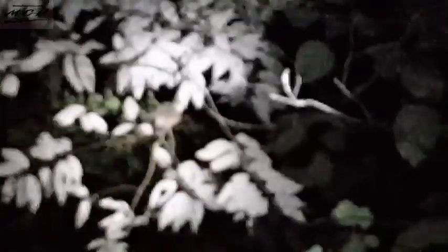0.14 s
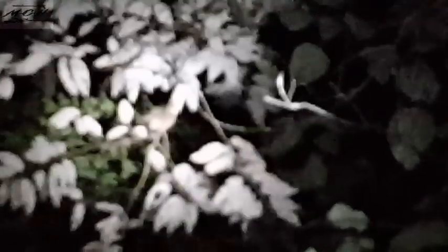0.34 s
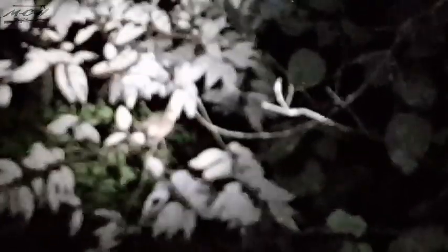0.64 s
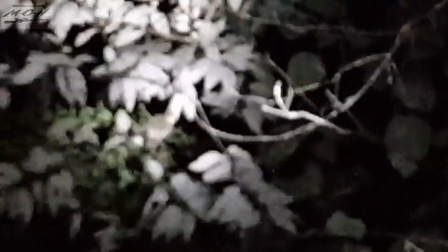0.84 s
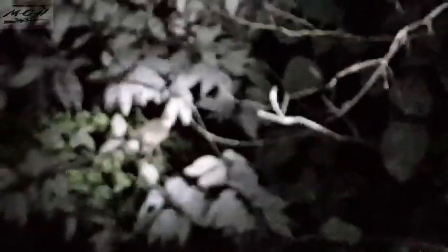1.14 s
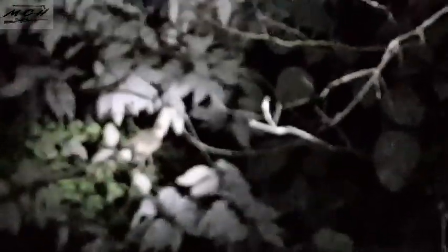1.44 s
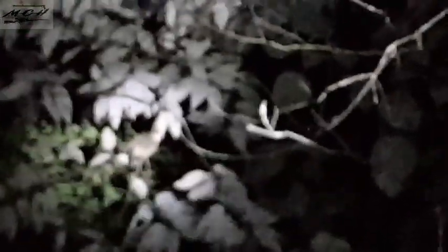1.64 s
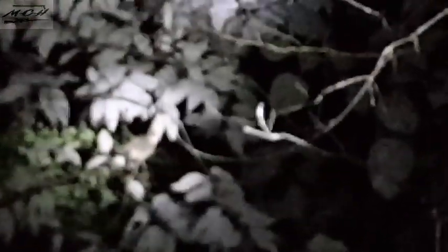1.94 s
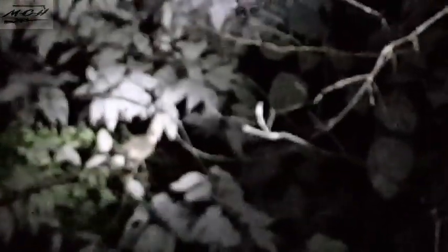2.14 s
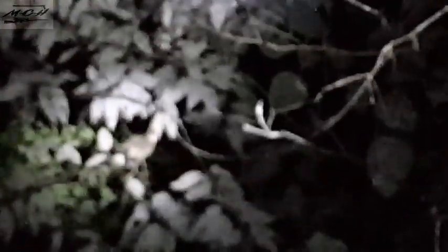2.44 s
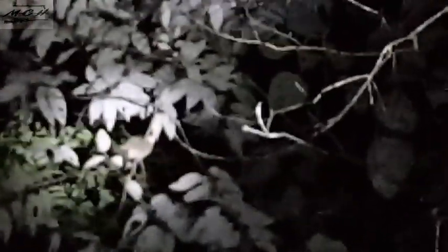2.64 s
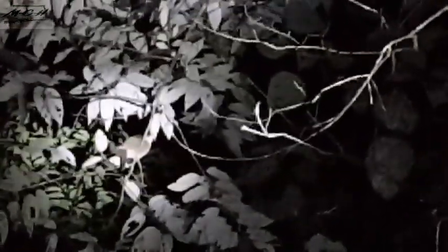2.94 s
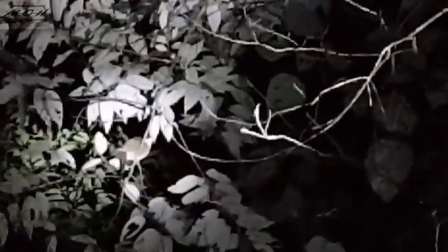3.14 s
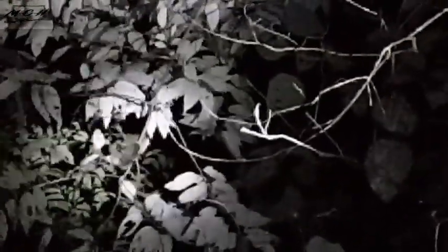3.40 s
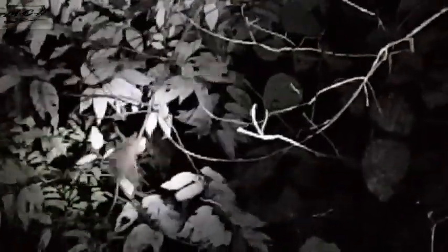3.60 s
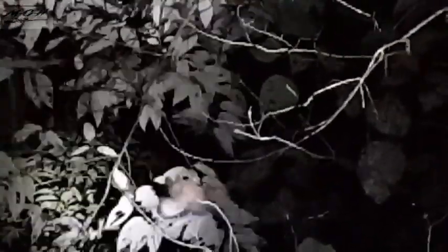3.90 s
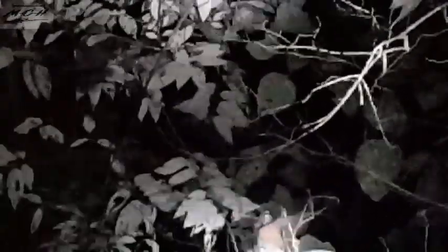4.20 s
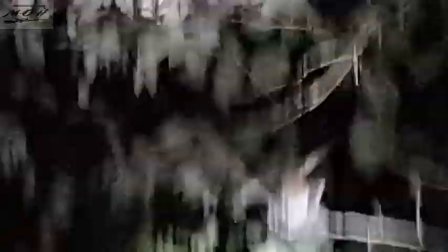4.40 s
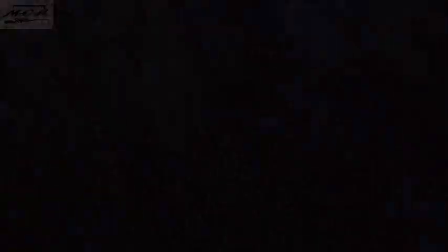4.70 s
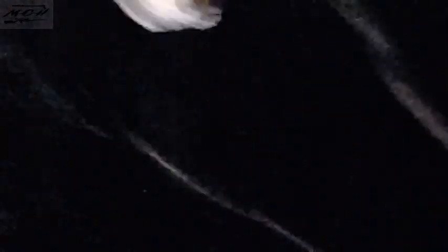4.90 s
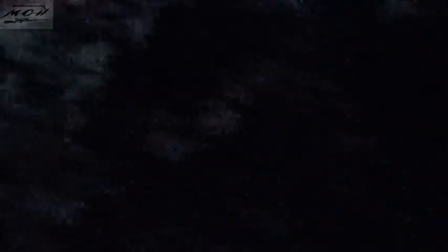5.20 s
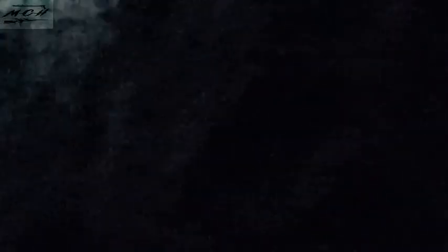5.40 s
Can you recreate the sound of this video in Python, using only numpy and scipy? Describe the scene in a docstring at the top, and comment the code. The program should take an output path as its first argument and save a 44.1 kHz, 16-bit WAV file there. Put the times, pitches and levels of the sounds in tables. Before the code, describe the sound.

Quiet outdoor night ambience with pulsing crickets, high fine insect trills and clicky frog calls. Just past the middle, one gun fires very near the microphone, sharp and overloaded, with immediate slaps from trees and a short fading roll. Frog clicks return faintly amid the lowered night hiss, then grainy cloth friction, hand scuffs and small casing knocks take over until the end.

```python
"""Night in a wood with one gunshot

Tree crickets throb in pulsed near-pure notes, a frog excites a resonance with clicks, and other insects
trill as amplitude-modulated tones, over an even hiss of filtered noise. One gunshot cracks close by as
decaying noise and tones, scatters in the leaves and slaps back from the trunks; the recorder's gain ducks.
A second later the hand-held microphone is swung down: grainy noise rustles and short pulses bump it."""
import sys
import numpy as np
from scipy import signal
from scipy.fft import rfft, irfft
from scipy.io import wavfile
from scipy.ndimage import uniform_filter1d

SR = 44100
rng = np.random.default_rng(int(sys.argv[2]) if len(sys.argv) > 2 else 0)


def file_out(sig):
    """Save sig as 16-bit WAV at sys.argv[1]."""
    # one column per channel
    cols = np.atleast_2d(sig).T
    # limit, then scale
    lim = np.clip(cols, -1, 1)
    pcm = np.round(lim * 32767).astype(np.int16)
    wavfile.write(sys.argv[1], SR, pcm)


N = 244755
T = np.arange(N) / SR  # time in seconds
FREQ = np.maximum(np.fft.rfftfreq(N, 1 / SR), 1)  # spectrum bins in Hz

# Spectrum of the night air with far insects. Each row: frequency in Hz, relative density in dB per Hz.
NIGHT_SPECTRUM = [(18, -73), (30, -31), (81, -16), (249, -13), (518, -12.5), (591, -10), (639, -9),
                  (1330, -11.5), (1970, -6.5), (2490, -11), (3980, -18.5), (4420, -20.5), (6720, -23.5),
                  (7460, -23.5), (15500, -37.5)]
# Trills of smaller insects. Each row: start in seconds, end in seconds, pitch in Hz, upward glide in Hz,
# pitch waver in Hz, pulses per second, level in dB before the trees' echoes, left minus right in dB.
INSECT_TRILLS = [(-0.2, 0.18, 5350, 0, 30, 46, -69, -2), (0.101, 0.564, 3980, 15, 38, 62, -62, -11),
                 (0.701, 1.202, 3985, 20, 50, 62, -67, -5), (1.199, 1.66, 3985, 11.5, 44, 62, -63, -11),
                 (1.247, 1.9, 4910, 399.5, 110, 90, -71.5, -13),
                 (1.661, 2.193, 5230, 35, 27, 115, -65.5, -15), (1.751, 2.148, 3960, 40, 45, 62, -65, -4),
                 (3.699, 4.7, 4020, 0, 100, 58, -68.5, -10.5),
                 (3.833, 4.438, 5360, -21, 12.3, 47, -60, -2.5), (5.155, 5.398, 3930, 28, 40, 62, -62, -10)]
# Bouts of the near tree crickets. Each row: first chirp in seconds, last chirp in seconds, chirps per second,
# pitch in Hz, leader's level at full effort in dB before flutter and echoes, leader's left minus right in dB,
# rival's level relative to the leader in dB.
CRICKET_BOUTS = [(0.04, 0.54, 16.2, 1952, -45.5, -0.5, -11), (0.72, 1.31, 15.3, 1949, -37, 0.5, -3.5),
                 (1.679, 2.217, 16.6, 1968, -36, 7, -4.5), (2.946, 3.31, 16.3, 1940, -45.5, 0, -14),
                 (4.687, 5.25, 14.5, 1935, -47, 6, -4.5)]
# Frog calls. Each row: start in seconds, peak of the opening clicks in dB before the trees' echoes.
FROG_CALLS = [(0.1174, -40), (0.393, -40), (0.6799, -39.5), (0.9851, -39), (2.912, -45), (3.1252, -40.5),
              (3.691, -39.5), (3.9627, -39.5)]
# Ticks of the gun's action and of twigs. Each row: start in seconds, pitch in Hz, bandwidth in Hz,
# level in dB, decay time in seconds.
SHARP_TICKS = [(3.3724, 5500, 4500, -37, 0.011), (3.376, 8000, 2500, -34, 0.0019),
               (3.379, 2900, 1500, -27, 0.0059), (3.534, 2040, 700, -25, 0.0073),
               (3.570, 7000, 5000, -27, 0.0027), (3.761, 3000, 3500, -41, 0.0033),
               (4.644, 2000, 4000, -43, .002)]
# Spectrum of the muzzle blast. Each row: frequency in Hz, relative density in dB per Hz.
BLAST_SPECTRUM = [(24, -39), (40, 0), (903, 2.5), (1680, -14.5), (2330, -8.5), (3650, -12.5), (4130, -17),
                  (4800, -8), (5440, -21), (8520, -4.5), (9410, -15.5), (12400, -10), (15500, -24.5)]
# The boom under the crack. Each row: frequency in Hz, level in dB before the low cut and panning,
# decay time in seconds.
BOOM_TONES = [(196, -14, 0.0073), (283, -15, 0.0028), (784, -12, 0.0045)]
# Spectrum of the scatter in near leaves. Each row: frequency in Hz, relative density in dB per Hz.
LEAF_SPECTRUM = [(47, -40), (80, -18), (202, -20), (544, -21), (864, -9), (1310, -11.5), (2430, -5.5),
                 (3950, -9.5), (4930, -4), (6010, -6.5), (8000, -2.5), (10200, -9), (15500, -10)]
# Spectrum of the roll of the wood. Each row: frequency in Hz, relative density in dB per Hz.
WOOD_SPECTRUM = [(47, -57.5), (80, -25), (185, -21), (321, -20.5), (358, -17), (569, -8), (1600, -8.5),
                 (2000, -0.5), (2490, -4.5), (2720, -3), (6280, -12.5), (8360, -4), (10200, -21),
                 (12700, -12), (15500, -27.5)]
# Ringing of the wood. Each row: frequency in Hz, time to fall 60 dB in seconds.
WOOD_RINGING = [(100, 1), (500, 0.61), (2000, 0.58), (5000, 0.51), (9000, 0.5), (15000, 0.42)]
# Slaps back from trunks. Each row: time in seconds, pitch in Hz, peak in dB before gain control.
TRUNK_SLAPS = [(3.4241, 1780, 5), (3.4317, 1210, -3)]
# Spectrum of the rustle. Each row: frequency in Hz, relative density in dB per Hz.
RUSTLE_SPECTRUM = [(200, -6), (700, -2), (2000, 1.5), (3200, -3.5), (5200, -3), (6500, -9), (8200, -2),
                   (10000, -13), (13000, -9), (15500, -18)]
# Spectrum of the scuffs before softening. Each row: frequency in Hz, relative density in dB per Hz.
SCUFF_SPECTRUM = [(35, -32), (60, -11), (339, -8), (711, -2), (1710, -10), (1960, -8), (3270, -9.5),
                  (5180, -9), (6530, -18), (8040, -4), (10100, -16), (15000, -30)]
# Scuffs of hand and sleeve. Each row: start in seconds, level in dB before softening, low-pass corner in Hz.
HAND_SCUFFS = [(4.55, -47.5, 6000), (4.667, -45, 5000), (4.744, -37.5, 2010), (4.813, -38.5, 9000),
               (4.885, -37.5, 9000), (4.955, -39, 6050), (5.026, -40.5, 4000), (5.088, -43, 4000),
               (5.247, -46.5, 5000), (5.503, -46, 3970)]
# Bumps on the casing. Each row: start in seconds, relative peak in dB, decay time in seconds,
# number of knocks in a row.
CASING_BUMPS = [(4.674, -40, .001, 1), (4.7508, -29, .0008, 4), (4.8273, -34, 0.00023, 1),
                (4.848, -35, .0002, 1), (4.897, -32, 0.0002, 1), (4.905, -36, .0003, 1),
                (4.928, -46, .0002, 1), (5.014, -36.5, 0.0026, 1), (5.039, -33.5, .0006, 2),
                (5.101, -38.5, .0003, 1)]

NIGHT_DB = -52.5
# one very high rasp of a bush cricket
RASP_AT_S, RASP_RISE_S, RASP_DECAY_S, RASP_DB = 1.385, .025, .056, -61
# cricket effort: the first chirp is softer and flatter by this much; effort peaks at this share of a bout
SOFT_START_DB, FLAT_START_HZ, FULL_EFFORT_SHARE = 2, 15, .55
CHIRP_SCATTER_DB, CHIRP_SCATTER_HZ = 1.0, 8
CHIRP_S, CHIRP_SAG_HZ_PER_S, CHIRP_WAVER_HZ = .052, 360, 12.8
FLUTTER_PER_S, FLUTTER_DB = 90, 1.7  # quick flutter of the song's loudness
RIVAL_LAG_S, RIVAL_FLAT_HZ, RIVAL_PAN_DB = .03, 8.2, -.5
FAR_CRICKETS_HZ, FAR_CRICKETS_DB = 1943, -65
# the swing gathers speed, is fastest at one moment and settles
SWING_START_S, SWING_FASTEST_S, SWING_SETTLE_S = 4.45, 4.865, .37
GRIP_SHIFTS_S = 4.06  # the hand starts to rumble on the casing before the swing
RUSTLE_DB, RUMBLE_DB, RUMBLE_LURCH_DB = -43.5, -60, 2.5
REBOUND_S, REBOUND_LOSS_DB = .0042, 2.5  # spacing and loss of successive knocks
SCUFF_S = .035
TOP_HZ = 15600  # upper edge of the recorder's passband


def undb(db):
    """Logarithmic level: decibels become an amplitude ratio."""
    return 10 ** (np.asarray(db) / 20)


def unit(x):
    """Normalization: scale to a root-mean-square of 1."""
    return x / np.sqrt(np.mean(x ** 2) + 1e-20)


def pan(db):
    """Interaural level difference: gains for left minus right in dB."""
    return undb(np.array([[db], [-db]]) / 2)


def at_hz(points, hz):
    """Interpolation along a logarithmic frequency axis."""
    f, value = np.transpose(points)
    return np.interp(np.log(hz), np.log(f), value)


def colour(points):
    """Spectral shaping: gain at each bin from (Hz, dB) points."""
    return undb(at_hz(points, FREQ))


def resonance(hz, width_hz):
    """Resonance: a gain that falls steeply away from its centre."""
    return 1 / (1 + ((FREQ / hz - hz / FREQ) * hz / width_hz) ** 2)


def noise(gain, alike_hz=500, grain_db=0):
    """Partial coherence: filtered stereo noise, alike in both ears in the bass, crackling with grain_db."""
    grain = np.minimum(rng.exponential(size=N // 16 + 1), 6)
    crackle = undb(grain_db * grain).repeat(16)[:N]
    spec = rfft(rng.standard_normal((3, N)) * crackle)
    shared = 1 / (1 + (FREQ / alike_hz) ** 2)
    ears = np.sqrt(shared) * spec[2] + np.sqrt(1 - shared) * spec[:2]
    return unit(irfft(gain * ears, N))


def walk(rate):
    """Random modulation: straight lines join chance values, rate per second, with a spread near 1."""
    return np.interp(T * rate, np.arange(2000), rng.standard_normal(2000))


def burst(start, rise, decay):
    """Impulsive excitation: a linear rise followed by exponential decay."""
    age = np.maximum(T - start, 0)
    fall = np.minimum(np.maximum(age - rise, 0) / decay, 60)
    return np.minimum(age / rise, 1) * np.exp(-fall)


def swell(start, end, edge):
    """Gradual onset and release: an envelope with sinusoidal edges."""
    return np.sin(np.pi / 2 * np.clip(np.minimum(T - start, end - T) / edge, 0, 1))


def low_cut(x, hz):
    """High-pass filtering of second order."""
    return signal.sosfilt(signal.butter(2, hz, "high", fs=SR, output="sos"), x)


def among_trees(x, t60, wet_db):
    """Multiple scattering: direct sound plus sparse decaying echoes from trunks, different in each ear."""
    t = T[:SR]
    sparse = rng.random((2, len(t))) < .03
    echoes = rng.standard_normal((2, len(t))) * sparse * undb(-60 * t / t60)
    echoes *= undb(wet_db) / np.sqrt(np.sum(echoes ** 2, axis=1, keepdims=True))
    echoes[:, 0] += 1  # direct sound
    return signal.fftconvolve(np.atleast_2d(x), echoes, axes=1)[:, :N]


def night():
    """Broadband noise: the soft, even hiss of the dark wood."""
    return noise(colour(NIGHT_SPECTRUM), alike_hz=413) * undb(NIGHT_DB + .84 * walk(5.333))


def trills(between_strokes=.15):
    """Amplitude modulation: wing strokes pulse a wavering note, beside a far chorus and one high rasp."""
    near = 0
    for start, end, hz, glide_hz, waver_hz, rate, db, side in INSECT_TRILLS:
        pitch = hz + np.interp(T, [start, end], [0, glide_hz]) + waver_hz * walk(330)
        strokes = between_strokes + np.sin(np.pi * rate * (T - start)) ** 4
        note = unit(strokes * np.sin(2 * np.pi * np.cumsum(pitch) / SR))
        near = near + note * swell(start, end, .18) * undb(db) * pan(side)
    near = among_trees(near, t60=.25, wet_db=-8)
    chorus = noise(resonance(6640, 600)) * undb(-70 + walk(25)) * pan(-7)
    chorus += noise(resonance(5360, 250)) * undb(-70.5 + 2 * walk(6.2))
    chorus += noise(resonance(3940, 420)) * undb(-65.5 + 1.7 * walk(4.03))
    rasp = noise(resonance(12800, 3200)) * burst(RASP_AT_S, RASP_RISE_S, RASP_DECAY_S) * undb(RASP_DB)
    return near + chorus + rasp


def chirp(when, hz):
    """Frequency modulation: a near-pure note swells and fades while its pitch sags and wavers."""
    live = np.abs(T - when) < CHIRP_S / 2
    t = T[live] - when
    waver = np.interp(t, np.linspace(t[0], t[-1], 12), rng.standard_normal(12))
    pitch = hz - CHIRP_SAG_HZ_PER_S * t + CHIRP_WAVER_HZ * waver
    cycles = np.cumsum(pitch) / SR + rng.random()
    note = np.zeros(N)
    note[live] = np.cos(np.pi * t / CHIRP_S) * np.sin(2 * np.pi * cycles)
    return note


def tree_crickets():
    """Periodic stridulation: effort raises level and pitch; a rival, trees and far neighbours fill the gaps."""
    song = 0
    for first, last, rate, hz, db, side, rival_db in CRICKET_BOUTS:
        leader = rival = 0
        count = round((last - first) * rate) + 1
        for k, (loud, sharp) in enumerate(rng.standard_normal((16, 2))[:count]):
            when = first + k / rate
            progress = (when - first) / (last - first)
            slack = (1 - progress / FULL_EFFORT_SHARE) ** 2  # 0 at full effort
            pitch = hz - FLAT_START_HZ * slack + CHIRP_SCATTER_HZ * sharp
            strength = undb(db + CHIRP_SCATTER_DB * loud - SOFT_START_DB * slack)
            leader = leader + strength * chirp(when, pitch)
            rival = rival + strength * chirp(when + RIVAL_LAG_S, pitch - RIVAL_FLAT_HZ)
        song = song + leader * unit(pan(side))
        song = song + rival * undb(rival_db) * pan(RIVAL_PAN_DB)
    neighbours = noise(resonance(FAR_CRICKETS_HZ, 85)) * undb(FAR_CRICKETS_DB + 2 * walk(3))
    fluttering = song * undb(FLUTTER_DB * walk(FLUTTER_PER_S))
    early = among_trees(fluttering, t60=.33, wet_db=-6.5)
    return among_trees(early, t60=1.5, wet_db=-5) + neighbours


def frog(note_hz=2940, gap_s=.016, rattle_hz=125):
    """Damped resonance: two throat clicks, then a lower, drier rattle, smeared by scattering from trees."""
    calls = np.zeros(N)
    t = T[:SR // 40]
    for start, db in FROG_CALLS:
        for k, (late, detune, size) in enumerate(rng.standard_normal((22, 3))):
            when = start + (k > 0) * (gap_s + (k - 1 + .2 * late) / rattle_hz)
            strength = 1 if k < 2 else .88 * .901 ** k * undb(2 * size)
            ring_s = .001 if k < 2 else .00028 + .00003 * k  # the rattle softens as it fades
            hz = note_hz * (1 + .023 * detune - .06 * np.tanh(k / 8))
            envelope = t / ring_s * np.exp(1 - t / ring_s)
            click = envelope * np.sin(2 * np.pi * hz * t)
            i = int(when * SR)
            calls[i:i + len(t)] += undb(db) * strength * click
    return among_trees(calls, t60=.52, wet_db=7.7)


def ticks():
    """Impact noise: the gun's action snaps just before the shot; twigs crack afterwards."""
    return sum(noise(resonance(hz, width_hz)) * burst(start, .00057, decay) * undb(db)
               for start, hz, width_hz, db, decay in SHARP_TICKS)


def wood_roll():
    """Frequency-dependent reverberation: each band of the wood's roll decays at its own rate."""
    roll, spec = 0, rfft(noise(colour(WOOD_SPECTRUM), grain_db=1.0))
    centres = np.array(WOOD_RINGING)[:, 0]
    for band, (_, t60) in zip(np.eye(len(WOOD_RINGING)), WOOD_RINGING):
        share = at_hz(np.column_stack([centres, band]), FREQ)  # overlapping bands sum to 1
        roll = roll + irfft(spec * share, N) * burst(3.40, .022, t60 / np.log(1000))
    return roll * undb(-17.5)


def trunk_slaps():
    """Discrete reflection: bark returns short, dull pressure waves."""
    slaps = 0
    for when, hz, db in TRUNK_SLAPS:
        cycles = (T - when) * hz
        slaps = slaps - undb(db) * np.exp(-np.abs(cycles) / .44) * np.cos(2 * np.pi * cycles)
    return slaps


def gunshot():
    """Blast and scattering: crack and boom, then bright leaf echoes, trunk slaps and the roll of the wood."""
    fired = 3.3822  # seconds
    blast = low_cut(noise(colour(BLAST_SPECTRUM), alike_hz=890), 1010)
    crack = blast * burst(fired, .0017, .0046) * undb(-.5) * pan(.89)
    boom = sum(undb(db) * np.sin(2 * np.pi * hz * (T - fired)) * burst(fired, .0013, decay)
               for hz, db, decay in BOOM_TONES)
    boom = low_cut(boom, 70) * pan(2)
    leaves = noise(colour(LEAF_SPECTRUM), grain_db=1.5) * burst(3.390, .0072, .034) * undb(-9)
    undergrowth = noise(resonance(1980, 1700)) * burst(3.4225, .0084, .022) * undb(-12)
    thud = noise(resonance(363, 419)) * burst(3.419, .0087, .014) * undb(-25)
    far = noise(resonance(1450, 3500)) * burst(3.476, .093, .19) * undb(-40)
    return crack + boom + leaves + trunk_slaps() + undergrowth + thud + wood_roll() + far


def swing_noise():
    """Friction noise: the cloth's rustle follows the swing's speed while the gripped casing rumbles."""
    gathering = np.clip((T - SWING_START_S) / (SWING_FASTEST_S - SWING_START_S), 0, 1)
    speed = gathering ** 2 * np.exp(-np.maximum(T - SWING_FASTEST_S, 0) / SWING_SETTLE_S)
    rustle = noise(colour(RUSTLE_SPECTRUM), alike_hz=885, grain_db=2.5) * speed * undb(RUSTLE_DB)
    grip = np.clip((T - GRIP_SHIFTS_S) / (SWING_FASTEST_S - GRIP_SHIFTS_S), 0, 1)
    rumble = noise(resonance(102, 190)) * grip * undb(RUMBLE_DB + RUMBLE_LURCH_DB * walk(16))
    return rustle + rumble


def hand_scuffs():
    """Intermittent friction: low-passed grainy noise swells briefly at each scuff of hand and sleeve."""
    friction = noise(colour(SCUFF_SPECTRUM), alike_hz=1490, grain_db=2.5)
    scuffs = 0
    for start, db, hz in HAND_SCUFFS:
        softened = signal.lfilter(*signal.butter(1, min(hz, SR / 3), fs=SR), friction)
        scuffs = scuffs + softened * undb(db) * swell(start, start + SCUFF_S, SCUFF_S / 2)
    return scuffs


def casing_bumps():
    """Impact excitation: decaying pushes knock the casing and make it buzz."""
    pushes = sum(undb(db - k * REBOUND_LOSS_DB) * burst(start + k * REBOUND_S, .000067, decay)
                 for start, db, decay, count in CASING_BUMPS for k in range(round(count)))
    knocks = -low_cut(pushes, 85) * undb(2)
    buzz = noise(colour(RUSTLE_SPECTRUM), alike_hz=3000) * pushes * undb(-4)
    return knocks + buzz


def handling():
    """Superposition of the handling sounds as the microphone swings down."""
    return swing_noise() + hand_scuffs() + casing_bumps()


def scene():
    """Superposition: pressures of all sources add at the microphone."""
    return night() + trills() + tree_crickets() + frog() + ticks() + gunshot() + handling()


def record(dry, threshold_db=-29, squeeze=.35, recover_db=6):
    """Dynamic compression: gain drops at once, recovers by recover_db a second; peaks clip, the top is cut."""
    power = np.abs(uniform_filter1d(np.mean(dry ** 2, axis=0), size=360))
    over = squeeze * np.maximum(10 * np.log10(power + 1e-12) - threshold_db, 0)
    duck = np.maximum.accumulate(over + recover_db * T) - recover_db * T  # gain reduction in dB
    limited = np.clip(dry * undb(-duck), -.8, .8)
    return signal.sosfilt(signal.ellip(10, .2, 75, TOP_HZ, fs=SR, output="sos"), limited)


dry = scene()
out = record(dry)
file_out(out)
```